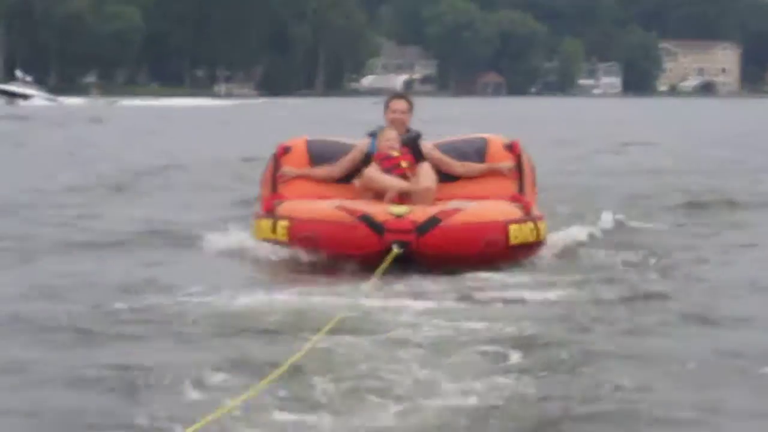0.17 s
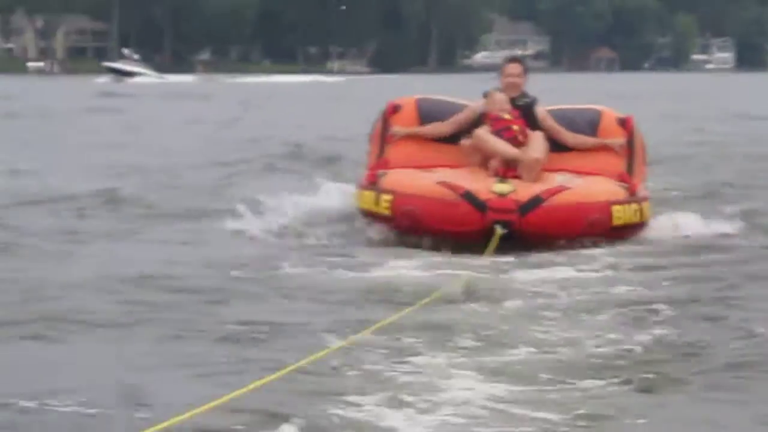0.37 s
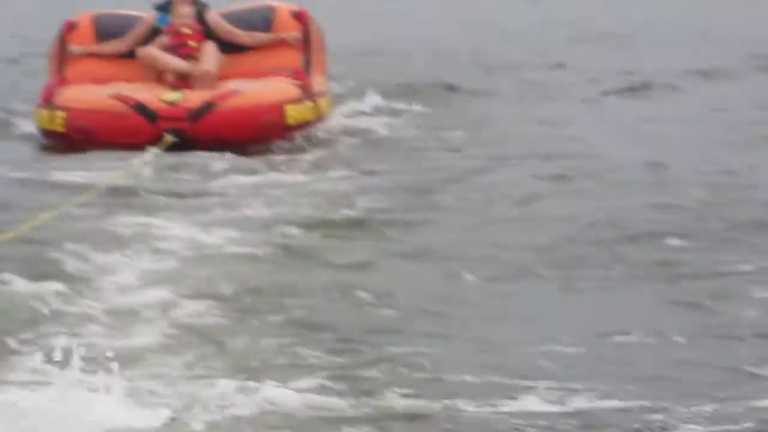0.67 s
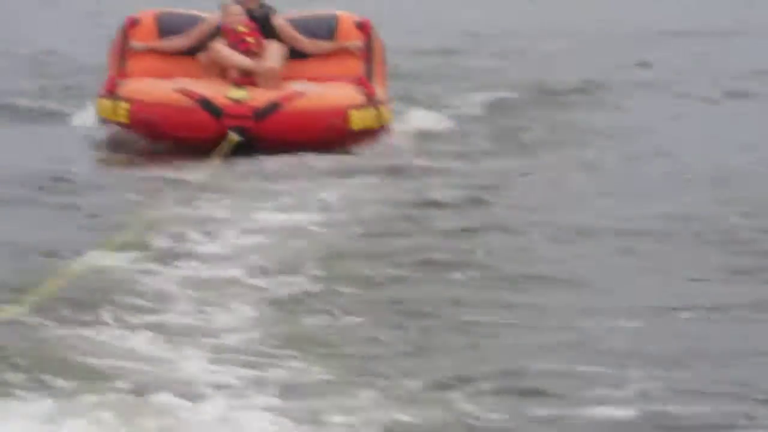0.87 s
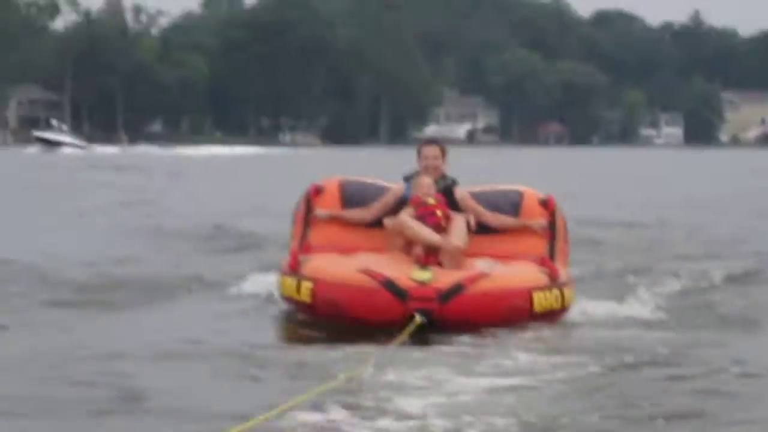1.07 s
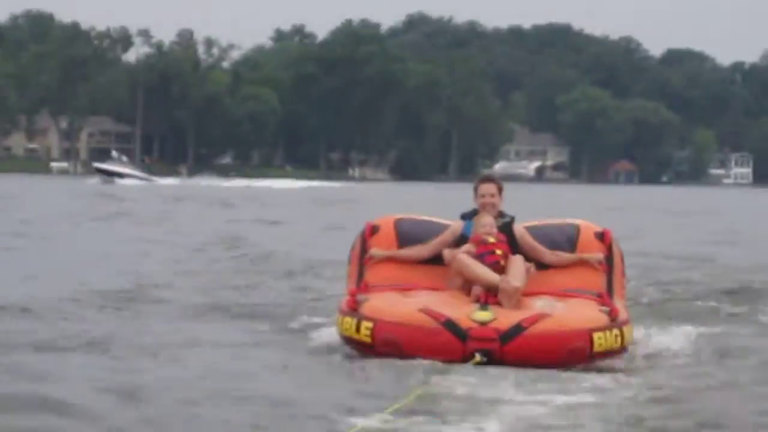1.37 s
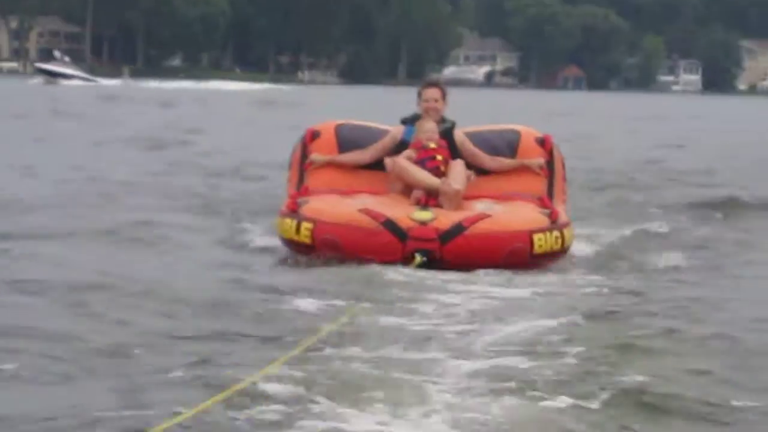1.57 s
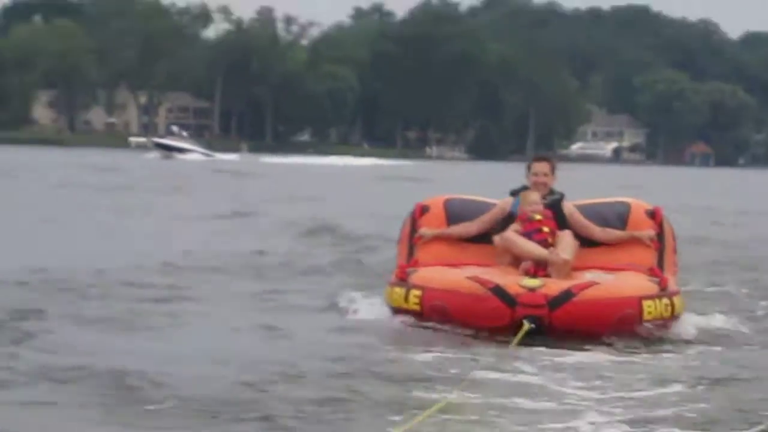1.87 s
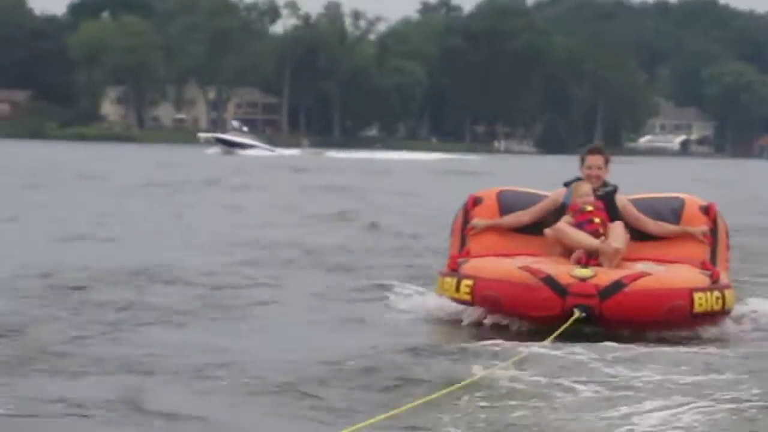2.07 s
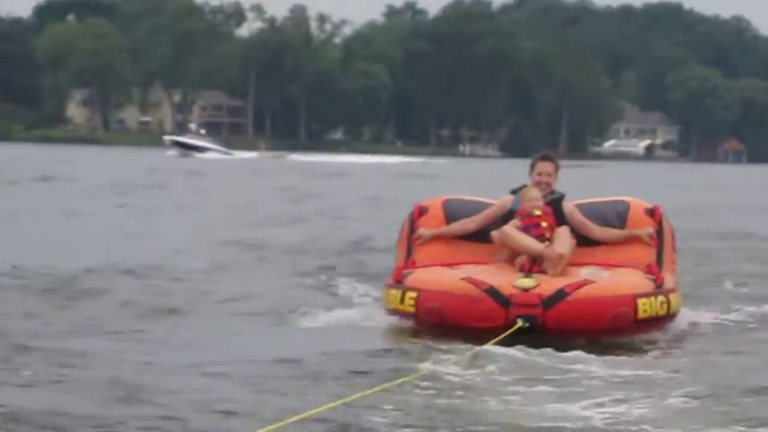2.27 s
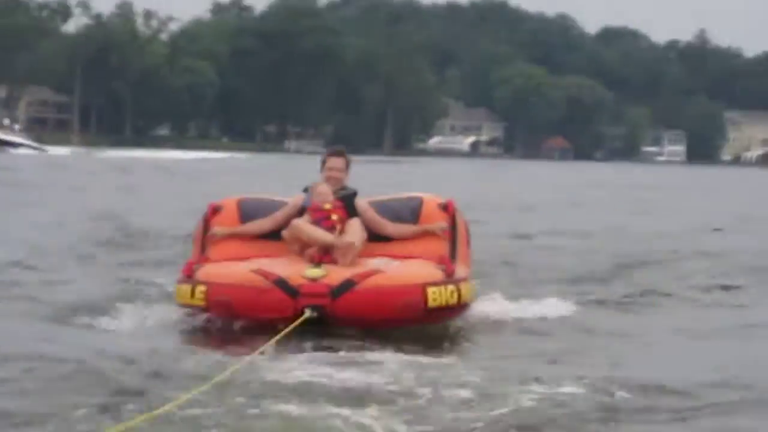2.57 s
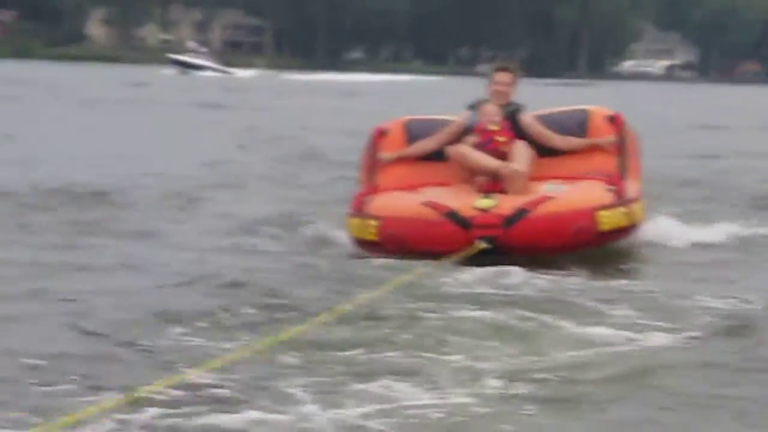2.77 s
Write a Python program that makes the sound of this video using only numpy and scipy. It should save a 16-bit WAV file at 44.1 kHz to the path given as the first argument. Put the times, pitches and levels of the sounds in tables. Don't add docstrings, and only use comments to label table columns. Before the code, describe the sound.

A motorboat engine holds a deep, slightly beating drone with a faint panel buzz, heard close from the stern on a lake; wake churns and gurgles, spray swells brightest past the middle, treble slightly dulled.

```python
import sys
import numpy as np
from scipy import signal
from scipy.io import wavfile

SR = 44100
rng = np.random.default_rng(int(sys.argv[2]) if len(sys.argv) > 2 else 0)


def materialize(psi):
    bounded = np.clip(np.atleast_2d(psi).T, -1, 1)
    quanta = np.round(bounded * 32767).astype(np.int16)
    wavfile.write(sys.argv[1], SR, quanta)


def linear_from_db(decibels):
    return 10 ** (np.asarray(decibels, float) / 20)


N = 128772
T = np.arange(N) / SR
CYLINDERS = 8


def in_time(seconds, values):
    return np.interp(T, seconds, values)


def rms_one(x):
    return x / np.sqrt(np.mean(x ** 2) + 1e-20)


def drift(rate_hz):
    r = np.exp(-80 * np.pi * rate_hz / SR)
    settle = 2000
    noise = rng.standard_normal(N // 40 + 2 + settle)
    slow = signal.lfilter([1], [1, -2 * r, r * r], noise)[settle:]
    return np.interp(np.arange(N) / 40, np.arange(len(slow)), rms_one(slow - slow.mean()))


def banded_noise(colour, shared_db, own_db, tilt_db=0):
    tilt_about_hz = 4000
    hz, db = np.transpose(colour)
    together = drift(9)
    white = rng.standard_normal((2, N))
    edges = 22 * 2 ** np.arange(0, 9.7, .5)
    out = 0
    for k, (low, high) in enumerate(zip(edges, edges[1:])):
        band_pass = signal.butter(2, [low, high], "band", fs=SR, output="sos")
        band = signal.sosfilt(band_pass, white[k % 2])
        centre = np.sqrt(low * high)
        level = np.interp(np.log(centre), np.log(hz), db, left=-60, right=db[-1] - 3)
        level = level + tilt_db * np.log2(centre / tilt_about_hz)
        flicker = shared_db * together + own_db * drift(18)
        out = out + linear_from_db(level + flicker) * band
    return rms_one(out)


def grains(per_s, low_hz, high_hz, cycles, spread_db):
    sizes = linear_from_db(spread_db * np.minimum(rng.exponential(1, N), 5))
    signs = rng.choice([-1, 1], N)
    clicks = sizes * signs * (rng.random(N) < per_s / SR)
    dealt = rng.integers(0, 16, N)
    out = 0
    for k, hz in enumerate(np.geomspace(low_hz, high_hz, num=16)):
        r = linear_from_db(-60 * hz / (cycles * SR))
        w = 2 * np.pi * hz / SR
        struck = clicks * (dealt == k) + 1e-18
        out = out + signal.lfilter([0, np.sin(w)], [1, -2 * r * np.cos(w), r * r], struck)
    return rms_one(out)


# t/s, f/Hz
FIRING_RATE = [
    (0.0, 125.81),
    (0.365, 125.51),
    (0.73, 125.46),
    (1.095, 124.95),
    (1.46, 125.34),
    (1.825, 125.11),
    (2.19, 124.84),
    (2.555, 125.05),
    (2.92, 124.68),
]


def engine_cycles():
    start_cycle = .011
    firing_hz = in_time(*np.transpose(FIRING_RATE))
    return start_cycle + np.cumsum(firing_hz) / SR / CYLINDERS


# multiple of the cycle rate, level/dB rms, unsteadiness/dB
ENGINE_ORDERS = [(2, -58, 1), (4, -54, 1), (6, -30.3, .8), (7, -32.8, .8), (8, -15.6, .3), (9, -41.3, 1),
                 (10, -34.3, .8), (11, -43, 1), (12, -39.8, 1), (13, -52, 1), (14, -47.7, 1), (16, -55, 2),
                 (20, -50, 1.5), (21, -53, 1.5), (23, -50, 1.5), (32, -55, 2), (50, -50, 4)]


def engine(cycle):
    weak_cylinder_at, weak_bank_at = -.03, .12
    turned_again = 12
    wander_per_order = .02
    out = 0
    for order, db, shaky_db in ENGINE_ORDERS:
        from_firing = order - CYLINDERS
        weak_at = weak_cylinder_at if order % 2 else weak_bank_at
        half_turn = .5 * (order < CYLINDERS or order == turned_again)
        turn = half_turn - from_firing * weak_at
        wander = wander_per_order * abs(from_firing) * drift(5)
        level = np.sqrt(2) * linear_from_db(db + shaky_db * drift(12))
        out = out + level * np.cos(2 * np.pi * (order * cycle + turn) + wander)
    return out


# t/s, level/dB, brightening/dB per octave
SPRAY_SURGES = [(.04, -41, -3.5), (.14, -43, -4), (.24, -49.5, -6), (.4, -41, -3), (.56, -37.5, -2.5),
                (.75, -39.5, -3), (.9, -41.5, -3.3), (1., -38.5, -1.2), (1.25, -40.5, -1),
                (1.45, -40.5, -1.3), (1.56, -32, -0.2), (1.66, -26.5, 2.8), (1.72, -30, 0.7),
                (1.8, -30.5, 2), (2.07, -41.5, -2.5), (2.44, -41, -2.2), (2.8, -32.5, 1.2), (2.92, -33, 0)]
# f/Hz, level/dB per Hz
SPRAY_COLOUR = [(250, -16), (700, 3.5), (1100, 4.5), (2300, -3.5), (5000, -8), (8000, -8), (11000, -12.5),
                (15000, -20)]


def spray():
    trim_db = 3.5
    t, db, brightening = np.transpose(SPRAY_SURGES)
    spray_db = in_time(t, db)
    hiss = banded_noise(SPRAY_COLOUR, shared_db=.6, own_db=.7, tilt_db=in_time(t, brightening))
    return linear_from_db(spray_db + trim_db) * hiss, spray_db - spray_db.mean()


# f/Hz, level/dB per Hz
CHURN_COLOUR = [(25, -24), (55, -4), (82, 4), (110, 12), (170, 2.5), (300, 0), (520, -8), (1500, -14.5)]


def churn(swing_db):
    return linear_from_db(-29.5 + 0.26 * swing_db) * banded_noise(CHURN_COLOUR, shared_db=.6, own_db=.7)


def bubbles(swing_db):
    per_s = 400 * linear_from_db(3 * drift(12))
    gurgle = grains(per_s, 610, 1990, cycles=11.4, spread_db=1.2)
    return linear_from_db(-43 + 0.49 * swing_db) * gurgle


def drops(swing_db):
    per_s = 2000 * linear_from_db(4 * drift(10))
    patter = grains(per_s, 2500, 9000, cycles=3.0, spread_db=3.)
    return linear_from_db(-49 + swing_db) * patter


def water(cycle):
    pulse_db, exhaust_at = .55, .22
    spray_hiss, swing_db = spray()
    throb = linear_from_db(pulse_db * np.cos(2 * np.pi * (cycle - exhaust_at)))
    return throb * (spray_hiss + churn(swing_db) + bubbles(swing_db) + drops(swing_db))


# t/s, f/Hz, level/dB rms
PANEL_BUZZ = [(0.06, 283.2, -36), (0.11, 283.1, -35.5), (0.26, 283.4, -47.5), (0.39, 282.1, -35.5),
              (0.69, 282.1, -42.5), (0.85, 282.1, -34.5), (1.21, 282.0, -47.5), (1.29, 281.9, -36),
              (1.81, 282.3, -34.5), (2.29, 280.8, -38.5), (2.7, 282.2, -33.5), (2.84, 281.9, -40.5),
              (2.88, 281.9, -36), (2.9, 281.9, -74)]


def panel(cycle):
    panel_order = 18
    t, _, db = np.transpose(PANEL_BUZZ)
    return np.sqrt(2) * linear_from_db(in_time(t, db)) * np.cos(2 * np.pi * panel_order * cycle)


# t/s, peak level/dB
SLAPS = [(0.0834, -28), (0.1464, -16.5), (0.2674, -24), (0.3814, -25), (0.4579, -46), (0.5774, -46.5),
         (0.6404, -66.5), (0.6984, -41), (0.7654, -38), (0.9656, -18), (1.0394, -27), (1.1594, -25),
         (1.2244, -42), (1.4794, -29), (1.5384, -27), (1.5894, -41), (1.6544, -25), (1.7294, -25),
         (1.7894, -19), (1.8694, -17), (1.9294, -45), (2.1294, -32), (2.247, -21), (2.3514, -36),
         (2.492, -14.5), (2.6614, -26), (2.7614, -21.5), (2.8194, -37), (2.8694, -25)]
# f/Hz, level/dB per Hz
SLAP_COLOUR = [(400, 4), (1500, 5), (5000, -2), (9000, -0.5), (15000, -1.5)]


def slaps():
    attack_s, decay_s, trim_db = 0.0029, 0.02, -11
    shape = 0
    for t, db in SLAPS:
        age = np.maximum(T - t, 0)
        shape = shape + linear_from_db(db + trim_db) * (1 - np.exp(-age / attack_s)) * np.exp(-age / decay_s)
    return shape * banded_noise(SLAP_COLOUR, shared_db=1., own_db=2.)


# t/s, peak level/dB, f/Hz, 60 dB decay/s
PLOPS = [(.39, -20.5, 700, 0.026), (.497, -23, 816, 0.026), (.735, -24, 750, 0.035),
         (.925, -30.5, 1080, 0.063), (0.967, -22.5, 1130, 0.04), (.975, -25.5, 894, 0.051),
         (.965, -28, 620, 0.067), (1.18, -27, 790, 0.11), (1.594, -23.5, 750, 0.071),
         (1.644, -22, 755, 0.074), (1.694, -22.5, 784, 0.045), (1.838, -23, 890, 0.036),
         (1.864, -28, 1020, 0.027), (1.9298, -14, 870, 0.013), (2.631, -29.5, 830, 0.069),
         (2.755, -30.5, 1015, 0.068), (2.795, -25.5, 686, 0.046)]


def plops():
    pitch_rise, attack_cycles = 0.19, 0.27
    out = 0
    for t, db, hz, t60 in PLOPS:
        age = np.maximum(T - t, 0)
        fade = (1 - np.exp(-age * hz / attack_cycles)) * linear_from_db(db - 60 * age / t60)
        rise = 1 + pitch_rise * np.minimum(age / t60, 1)
        out = out + fade * np.sin(2 * np.pi * hz * age * rise)
    return out


def scene():
    cycle = engine_cycles()
    return (engine(cycle) + water(cycle) + panel(cycle) + slaps() + plops())[None]


def low_pass(x):
    return signal.sosfilt(signal.butter(12, 16580, fs=SR, output="sos"), x)


def record(dry):
    gain_hold, gain_s = .05, .012
    roll_off_hz, top_hz, opens_s = 6380, 15730, .0352
    r = np.exp(-1 / (gain_s * SR))
    mean = np.mean(dry ** 2)
    power = signal.lfilter([(1 - r) ** 2], [1, -2 * r, r * r], dry ** 2 - mean) + mean
    held = dry * (np.maximum(power, mean / 10) / mean) ** (-gain_hold / 2)
    roll_off = signal.bessel(2, roll_off_hz, fs=SR, output="sos", norm="mag")
    dulled = signal.sosfilt(roll_off, held)
    top_cut = signal.ellip(12, .5, 70, top_hz, fs=SR, output="sos")
    mix = signal.sosfilt(top_cut, dulled) * (np.arange(N) >= opens_s * SR)
    return low_pass(mix)


dry = scene()
out = record(dry)
materialize(out)
```